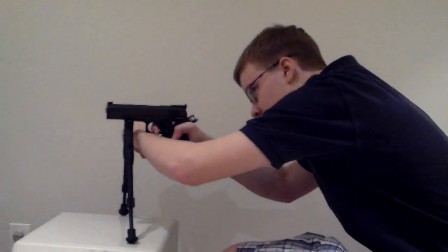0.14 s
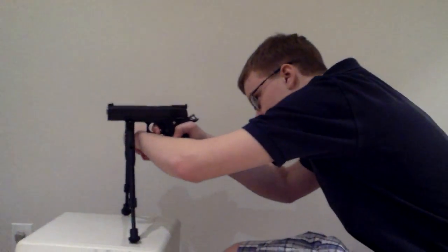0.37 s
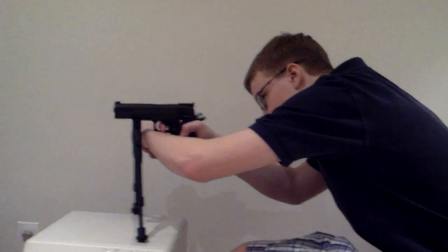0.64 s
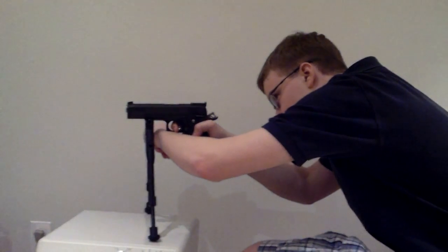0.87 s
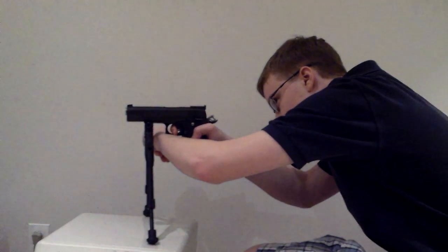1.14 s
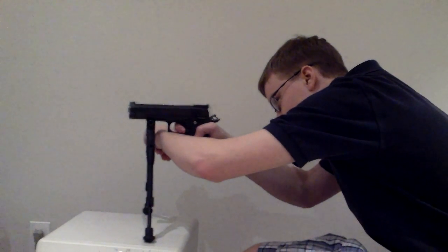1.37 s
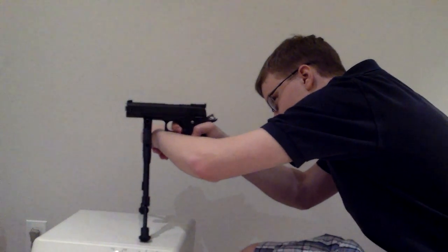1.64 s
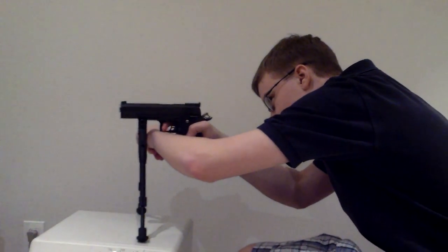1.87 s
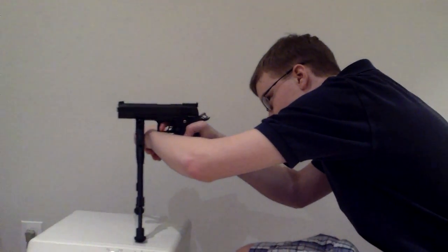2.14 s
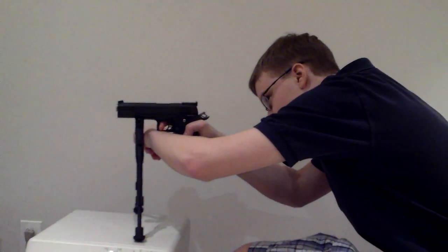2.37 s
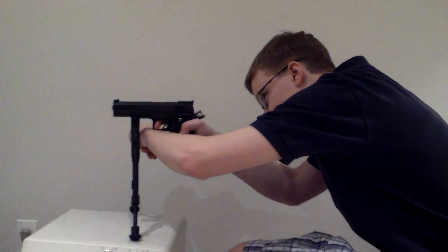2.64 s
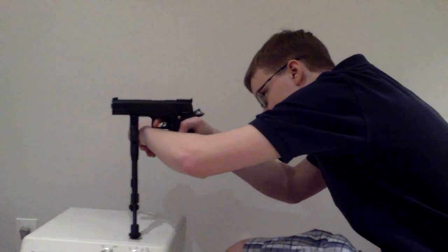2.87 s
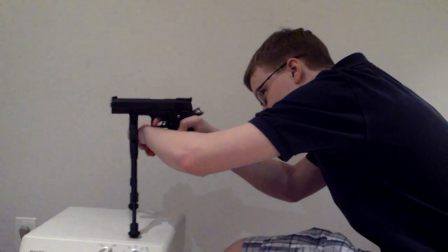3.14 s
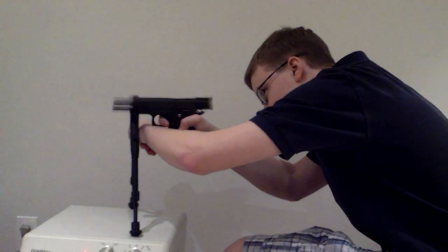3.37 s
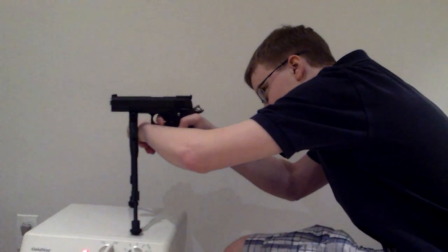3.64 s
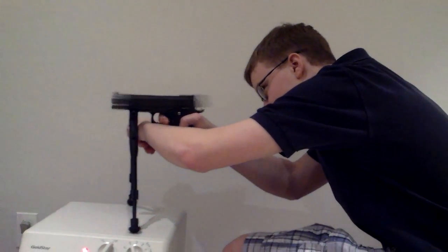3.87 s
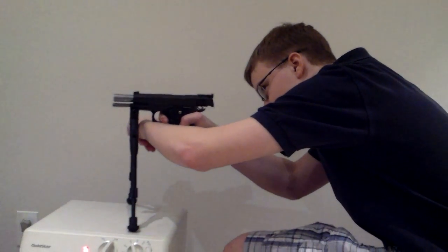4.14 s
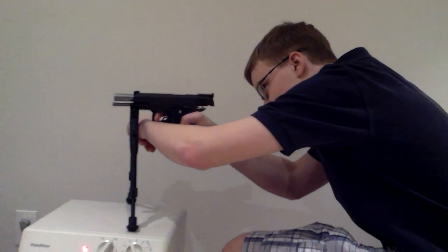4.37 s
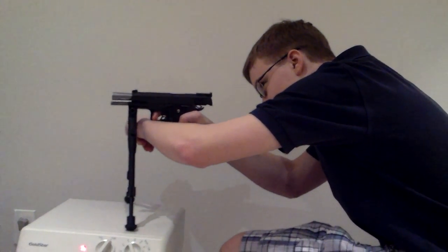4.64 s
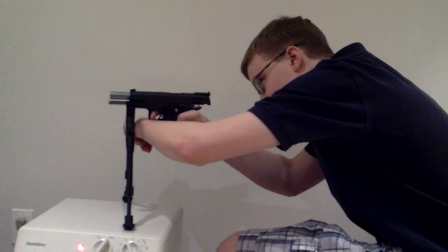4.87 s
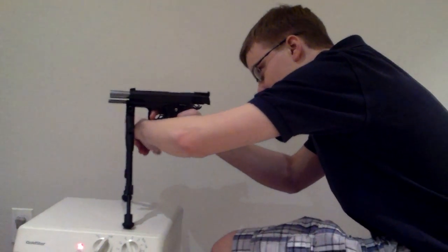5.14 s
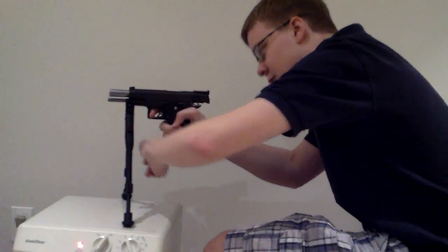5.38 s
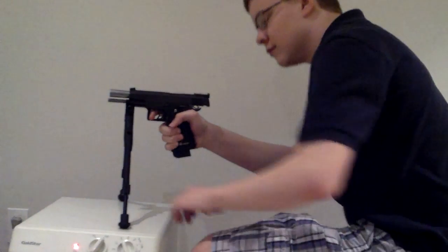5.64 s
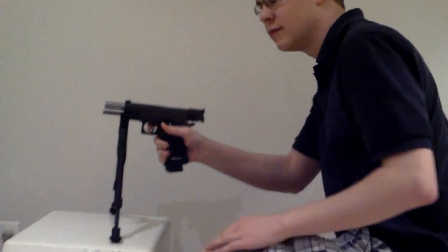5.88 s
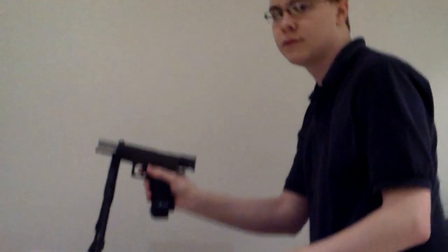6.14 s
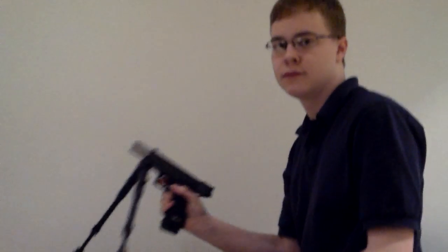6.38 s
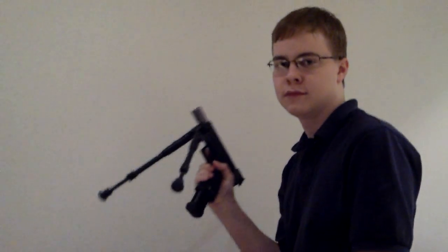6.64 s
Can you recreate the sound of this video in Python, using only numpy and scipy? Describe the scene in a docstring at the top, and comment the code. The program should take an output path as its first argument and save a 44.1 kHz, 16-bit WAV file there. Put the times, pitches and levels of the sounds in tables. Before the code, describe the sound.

A small, bare, lively room heard through a close, coloured little microphone with peaky upper mids and dull treble. Lumpy low rumble, faint hiss and a steady electrical buzz lie underneath, with tiny ticks at 0.15 and 0.3 s. A trigger click at 1.49 leads to two hard, dry cracks at 1.51 and 1.75, each with a gas puff, a slide slam and a clatter home about 0.06 s later. The background drops away, then returns; a soft hiss swells near 2.1. Small clicks at 3.51 precede a third shot at 3.56, then two more at 3.90 and 4.08. The last releases a rushing gas hiss that fades by about 4.7, with knocks and a tiny chink around 4.42 and sharp clicks at 4.58. Quiet bumps follow from 5.1 to 5.65, then light ticks, stand-leg taps and faint hiss from 6.0 to 6.75.

```python
"""A small bare room, where a gas pistol on a stand fires five times close to a resonant little microphone.
Each shot layers a noise puff from the valve, a pulse for the muzzle crack and struck modes for the slide
slamming back and clattering home; after the last one, filtered noise swells and dies as venting gas.
Hands tick and knock on trigger and stand, as clusters of noise and ringing modes.
A limiter ducks at each crack, so rumble, buzz and hiss sink after the shots and then return."""
import sys
import numpy as np
from scipy import signal
from scipy.fft import rfft, irfft
from scipy.io import wavfile
from scipy.ndimage import minimum_filter1d

SR = 44100
rng = np.random.default_rng(int(sys.argv[2]) if len(sys.argv) > 2 else 0)


def boost(x):
    """Linear amplitude factor 10**(x/20) for a level x in decibels (scalar or array-like)."""
    u = np.asarray(x, float) / 20
    return 10 ** u


def unload_audio(sound):
    """Save the sound as a 16-bit wav file, at the path given as the first command line argument."""
    columns = np.transpose(np.atleast_2d(sound))
    # keep every value between -1 and 1, then stretch to whole-number steps
    steps = np.round(np.clip(columns, -1, 1) * 32767)
    wavfile.write(sys.argv[1], SR, steps.astype(np.int16))


N = 297983
T = np.arange(N) / SR

# All source levels are set ahead of the limiter; shots, swells and handling also pass room and microphone.
# Shots: t/s, crack level/dB, valve puff level/dB, slide-back thump level/dB, slide return level/dB
SHOTS = [(1.511, 26.5, 4, 6.5, 4), (1.7456, 29, 2.5, 9, 6.5), (3.5560, 28.5, 10.5, 6.5, 5),
         (3.898, 25.5, -5.5, 4.5, 2), (4.079, 24.5, 4, 4.5, -4)]
# Near reflections of the muzzle crack: delay t/s, level/dB against the crack
REFLECTIONS = [(.0027, -5), (.0054, -12), (.0072, -11), (.0112, -11), (.0200, -15), (.0226, -13)]
# Modes of frame and slide: f/Hz, level/dB, T60 t/s
FRAME_MODES = [(400, -17, 0.0067), (560, -4.5, 0.0068), (824, -2, 0.0055), (1253, -9, 0.021),
               (7760, -23, 0.05)]
# Faint swells of hiss: peak t/s, level/dB, rise/(dB/s), fall/(dB/s)
HISS_SWELLS = [(0.039, -39.5, 14, 500), (1.46, -41.5, 105, 200), (2.119, -29.5, 67, 108),
               (2.78, -44, 405, 171.5), (6.08, -47.5, 54.5, 61), (6.39, -36.5, 78, 97),
               (6.75, -45.5, 202.5, 50)]
# Bright ticks of trigger and small metal parts: t/s, level/dB, time to fall 20 dB t/s
TICKS = [(.154, -37, 0.0029), (0.299, -38, .003), (.324, -32.5, 0.0036), (1.479, -31, 0.014),
         (1.494, -23, 0.011), (3.505, -39.5, .0033), (3.512, -25.5, .012), (3.525, -26, 0.0085),
         (4.410, -17.5, 0.091), (4.5765, -9, 0.0035), (4.5863, -8, 0.0011), (4.590, -3.5, .016),
         (5.843, -41, 0.0037), (5.993, -40, 0.0047), (6.099, -33, .005), (6.117, -32, 0.0067),
         (6.126, -30, 0.0073), (6.372, -40, 0.024), (6.73, -39.5, 0.0067), (6.739, -34, 0.008)]
# Dull knocks of hands, stand and the box under it: t/s, level/dB, centre f/Hz, time to fall 20 dB t/s
KNOCKS = [(0.323, -31, 350, 0.0074), (2.771, -42.5, 750, .02), (4.15, -5, 1870, 0.0098),
          (4.411, -10.5, 516, 0.034), (4.419, -3.5, 1100, 0.0076), (4.431, -14.5, 400, 0.097),
          (5.099, -45, 500, .03), (5.251, -38, 530, 0.022), (5.647, -37.5, 566, 0.04),
          (6.000, -24.5, 1900, 0.0069), (6.378, -30.5, 330, 0.022), (6.403, -33, 297, 0.026)]
# Taps on the legs of the stand: t/s, level/dB
LEG_TAPS = [(0.323, -54), (6.107, -39), (6.1185, -36), (6.13, -52)]
# Modes of the stand's legs: f/Hz, level/dB, T60 t/s
LEG_MODES = [(1300, -9, 0.05), (1880, -2.5, 0.082), (2540, -6, .02)]
# Modes of a small part that chinks: f/Hz, level/dB, T60 t/s
CHINK_MODES = [(7940, -1, 0.013), (9430, -10, .015), (10900, -4.5, 0.0089)]
# Decay of the room: f/Hz, T60 t/s
ROOM_T60 = [(150, 0.43), (400, 0.51), (1000, 0.51), (2800, 0.45), (5000, 0.51), (7300, 0.25), (14000, 0.16)]
# Response of the microphone: f/Hz, level/dB
MICROPHONE = [(60, -37), (190, -14.5), (380, -13), (1200, -16.5), (1700, -18.5), (2600, -17), (3800, -12.5),
              (4400, -5), (5000, -12.5), (7150, -32.5), (7700, -21), (8050, -24.5), (11000, -34.5),
              (16500, -46.5)]
# Rumble over time: t/s, level/dB
RUMBLE = [(0, -39.5), (1.2, -43), (2.2, -42.5), (3.4, -43), (5.2, -48), (6.0, -44), (6.76, -41.5)]
# Tone of the broad background hiss: f/Hz, relative level/dB
HISS_TONE = [(47, -31), (80, -19.5), (200, -14.5), (400, -20), (700, -23), (2960, -30.5), (3700, -30.5),
             (14800, -36.5), (16500, -47.5)]


def muzzle_crack():
    """A pressure pulse that swings down, then up, rings the barrel and returns in near reflections."""
    crack = np.zeros(N)
    for s, crack_db, *_ in SHOTS:
        i = round(s * SR)
        crack[i] -= boost(crack_db)
        crack[i + 3] += boost(crack_db - 1)
    crack = crack + boost(-20) * ring(crack, hz=4730, t60=0.002)    # barrel
    echoes = sum(boost(level_db) * np.roll(crack, round(delay * SR)) for delay, level_db in REFLECTIONS)
    return crack + echoes


def gas_puffs():
    """Turbulent gas: the valve puffs just before the crack, spent gas follows it."""
    air = np.zeros(N)
    for s, crack_db, puff_db, *_ in SHOTS:
        add(air, s - 0.0052, puff_db, lasts=0.014, rise=0.007)
        add(air, s + 0.001, crack_db - 21.5, lasts=0.030)
    return air


def slide():
    """The slide hits its stop, rebounds and clatters home; its blows ring frame and slide."""
    air, blows, closing = np.zeros((3, N))
    return_delay_s = 0.0613    # from crack to slide home
    for s, _, _, thump_db, return_db in SHOTS:
        home_s = s + return_delay_s
        blows[round((s + 0.0100) * SR)] -= boost(thump_db)    # stop
        blows[round((s + 0.0123) * SR)] -= boost(thump_db - 5)    # rebound
        add(air, home_s, return_db, lasts=0.010, rise=0.00031, body_hz=4500, spread=4.8)
        add(air, home_s + 0.003, return_db - 3, lasts=0.015, rise=0.0003, body_hz=2960, spread=2.5)
        add(blows, home_s, return_db - 28.5, lasts=0.010)
        closing[round(home_s * SR)] = boost(return_db - 10)
    return air + ring_modes(blows, FRAME_MODES) + ring(closing, hz=2416, t60=0.046)


def push():
    """Each shot shoves the air at the microphone for a few low cycles."""
    shoves = np.zeros(N)
    early_s, relative_db = 0.0033, -56.5    # against the crack
    for s, crack_db, *_ in SHOTS:
        shoves[round((s - early_s) * SR)] = boost(crack_db + relative_db)
    return ring(shoves, hz=103, t60=0.17)


def venting_gas():
    """Gas noise with a faint whistle swells, sags as the pressure falls, then dies faster."""
    start_s, level_db, rise_s, end_s = 4.088, -7, 0.072, 0.43    # rise and end count from the start
    sag_db_per_s, extra_end_db_per_s = 44, 102
    gas = signal.lfilter(*signal.butter(1, 5000, fs=SR), rng.standard_normal(N))
    gas = gas + boost(-13) * rms_one(ring(gas, hz=7800, t60=0.02))    # whistle
    t = T - start_s
    sag_db = sag_db_per_s * np.maximum(t - rise_s, 0)
    end_db = extra_end_db_per_s * np.maximum(t - end_s, 0)
    return gas * boost(level_db - sag_db - end_db) * np.clip(t / rise_s, 0, 1)


def hiss_swells():
    """Band-limited noise climbs and falls at steady dB rates over a faint bed."""
    hiss = signal.lfilter(*signal.butter(1, (1500, 5100), "band", fs=SR), rng.standard_normal(N))
    gain = boost(-60.5)    # bed
    for s, level_db, up, down in HISS_SWELLS:
        gain = gain + boost(level_db + np.minimum(up * (T - s), down * (s - T)))
    return hiss * gain


def handling():
    """Ticks and knocks are clusters of contacts; taps and a high chink ring their modes."""
    air, taps, chink = np.zeros((3, N))
    for s, level_db, lasts in TICKS:
        add(air, s, level_db, lasts, body_hz=3900, spread=1.75)
    for s, level_db, centre_hz, lasts in KNOCKS:
        add(air, s, level_db, lasts, rise=0.0014, body_hz=centre_hz, spread=1.65)
    for s, level_db in LEG_TAPS:
        add(taps, s, level_db, lasts=0.003)
    add(chink, 4.433, -22, lasts=0.03)
    return air + ring_modes(taps, LEG_MODES) + ring_modes(chink, CHINK_MODES)


def buzz():
    """An electrical buzz: evenly timed, rounded pulses of slightly uneven strength, high-passed."""
    rate_hz, first_s, rise_s = 29.97, 0.0098, 0.0022
    level_db, uneven_db = -44.5, 1    # uneven: standard deviation
    s = np.arange(first_s, N / SR - 0.001, 1 / rate_hz)
    clicks = np.zeros(N)
    clicks[(s * SR).astype(int)] = boost(level_db + uneven_db * rng.standard_normal(len(s)))
    t = T[:2000] / rise_s
    pulse = t ** 2 * np.exp(2 - 2 * t)    # peaks at 1 after the rise
    pulses = signal.fftconvolve(clicks, pulse)[:N]
    return signal.lfilter(*signal.butter(1, 25, "high", fs=SR), pulses)


def background():
    """Low noise made lumpy by a slow random gain, under a broad hiss."""
    low = signal.sosfilt(signal.butter(1, [8, 30], "band", fs=SR, output="sos"), rng.standard_normal(N))
    low = signal.sosfilt(signal.butter(2, 45, fs=SR, output="sos"), low)
    wander = rms_one(signal.lfilter(*signal.butter(2, 9, fs=SR), rng.standard_normal(N)))
    lumps = boost(3.63 * wander)    # 3.63 dB standard deviation
    rumble = rms_one(low * lumps) * boost(np.interp(T, *np.transpose(RUMBLE)))
    hiss = colour(rng.standard_normal(N), HISS_TONE)
    return rumble + boost(-62) * rms_one(hiss)


def room(x):
    """Direct sound and a diffuse field: each band stores energy and loses it by its T60."""
    out, edges = x.copy(), 60 * 2 ** np.arange(0, 8.6, 0.5)    # half-octave bands
    white = rng.standard_normal((2, N))
    fill = np.exp(-1 / (0.0015 * SR))    # the field builds with a 1.5 ms time constant
    for k, (low, high) in enumerate(zip(edges, edges[1:])):
        band = signal.butter(2, [low, high], "band", fs=SR, output="sos")
        t60 = at_hz(ROOM_T60, np.sqrt(low * high))
        keep = boost(-120 / (t60 * SR))    # energy kept per sample
        energy = signal.sosfilt(band, x) ** 2
        loss = np.convolve([1, -keep], [1, -fill])
        stored = signal.lfilter([(1 - keep) * (1 - fill)], loss, energy)
        diffuse = rms_one(signal.sosfilt(band, white[k % 2]))
        out += boost(-3) * diffuse * np.sqrt(np.abs(stored))
    return out


def add(track, s, level_db, lasts, rise=0.0001, body_hz=None, spread=1.5):
    """A cluster of uneven contacts starts at s; its envelope falls 20 dB in the given time."""
    t = np.arange(int(3 * lasts * SR) + 400) / SR
    grains = rng.standard_normal(len(t))
    shape = boost(-20 * t / lasts) * np.minimum(t / rise, 1)
    grains = grains * shape
    if body_hz:
        body = signal.butter(2, [body_hz / spread, body_hz * spread], "band", fs=SR, output="sos")
        grains = signal.sosfilt(body, grains)
    grains = rms_one(grains) * np.sqrt(np.mean(shape ** 2))    # level sets the whole cluster's energy
    i = round(s * SR)
    track[i:i + len(t)] += (boost(level_db) * grains)[:N - i]


def ring(clicks, hz, t60):
    """A two-pole resonator: a unit click sets a decaying sine of height 1 ringing."""
    r, w = boost(-60 / (t60 * SR)), 2 * np.pi * hz / SR
    return signal.lfilter([0, np.sin(w)], [1, -2 * r * np.cos(w), r * r], clicks + 1e-18)


def ring_modes(blows, modes):
    """Blows ring every mode of a body at once."""
    return sum(boost(level_db) * ring(blows, hz, t60) for hz, level_db, t60 in modes)


def colour(x, spectrum, size=8192):
    """Causal (minimum-phase) filter with the given dB spectrum, built by folding its cepstrum."""
    level_db = at_hz(spectrum, np.fft.rfftfreq(size, 1 / SR))
    cepstrum = irfft(np.log(boost(level_db)))
    cepstrum[1:size // 2] *= 2
    cepstrum[size // 2 + 1:] = 0
    return signal.fftconvolve(x, irfft(np.exp(rfft(cepstrum))))[:N]


def at_hz(points, hz):
    """Reads a frequency table, interpolating on a log-frequency axis."""
    table_hz, values = np.transpose(points)
    return np.interp(np.log(hz + 1), np.log(table_hz), values)


def rms_one(x):
    """Scales a signal to unit RMS."""
    return x / np.sqrt(np.mean(x ** 2) + 1e-20)


def scene():
    """Pistol, hiss swells and handling pass room and microphone; push, buzz and background join them."""
    shots = muzzle_crack() + gas_puffs() + slide() + venting_gas()
    hands = handling()
    share = boost(-2.5)    # handling stirs the room less than the shots do
    heard = room(shots + hiss_swells() + share * hands) + (1 - share) * hands
    return (colour(heard, MICROPHONE) + push() + buzz() + background())[None]


def roll_off(x):
    """The treble ends steeply here."""
    return signal.sosfilt(signal.butter(12, 16800, fs=SR, output="sos"), x)


def record(dry):
    """A limiter grabs fast, holds, then lets go at a steady dB rate; it cuts the bass deeper than the rest."""
    ceiling_db, attack_s, hold_s, release_db_per_s = -4.5, 0.00084, 0.29, 84
    bass_hz, bass_ducking = 110, 3    # bass cut in dB is this many times the rest
    over_db = np.maximum(20 * np.log10(np.abs(dry[0]) + 1e-9) - ceiling_db, 0)
    hold = int(hold_s * SR) | 1
    held_db = -minimum_filter1d(-over_db, hold, origin=hold // 2, mode="constant")
    release_db = release_db_per_s * T
    held_db = np.maximum.accumulate(held_db + release_db) - release_db
    ahead = np.append(held_db[40:], held_db[-40:])    # looks 40 samples ahead
    r = np.exp(-1 / (attack_s * SR))
    cut_db = signal.lfilter([1 - r], [1, -r], ahead)
    bass = signal.lfilter(*signal.butter(1, bass_hz, fs=SR), dry)
    limited = (dry - bass) * boost(-cut_db) + bass * boost(-bass_ducking * cut_db)
    hiss = boost(-70.5) * rng.standard_normal(N)    # the converter adds its own after the gain
    return roll_off(limited + hiss)


dry = scene()
out = record(dry)
unload_audio(out)
```